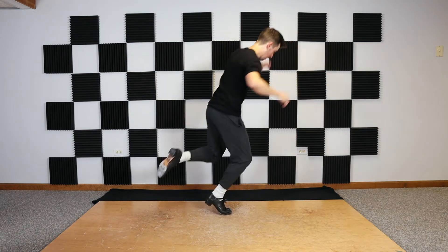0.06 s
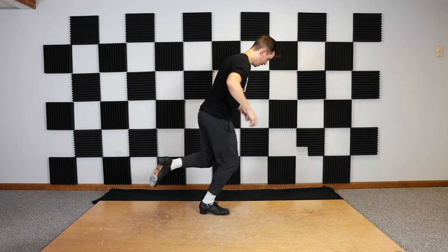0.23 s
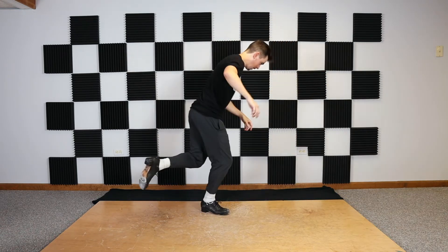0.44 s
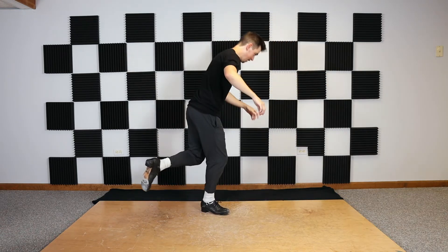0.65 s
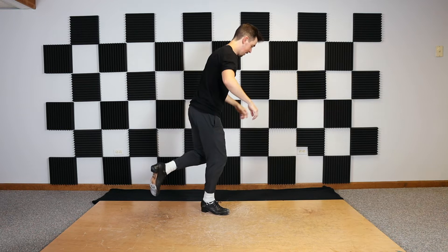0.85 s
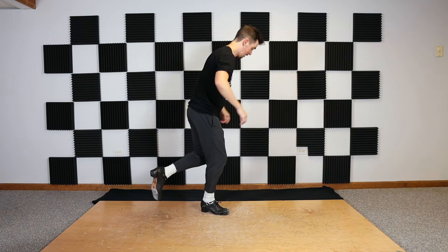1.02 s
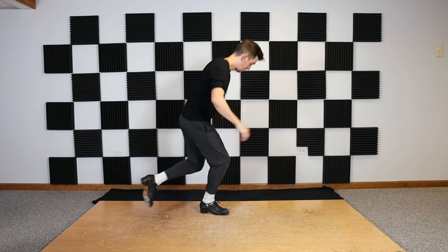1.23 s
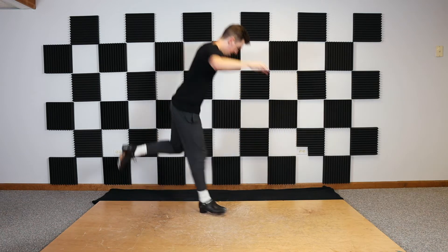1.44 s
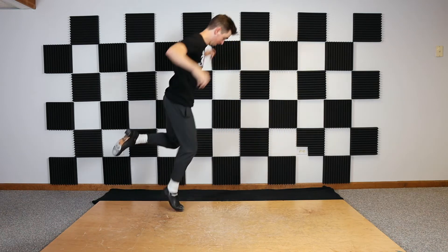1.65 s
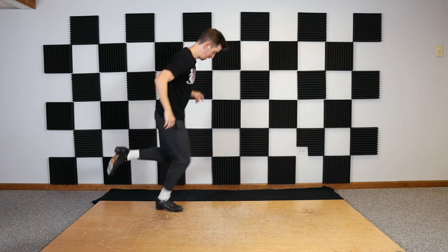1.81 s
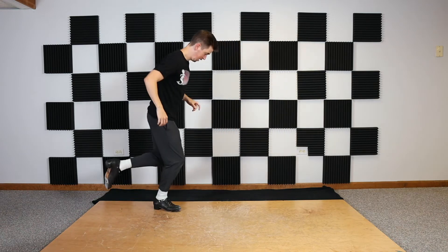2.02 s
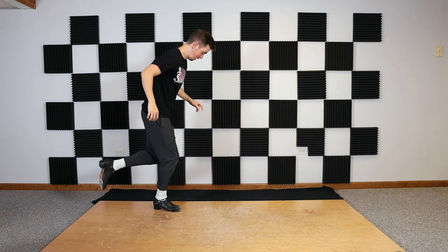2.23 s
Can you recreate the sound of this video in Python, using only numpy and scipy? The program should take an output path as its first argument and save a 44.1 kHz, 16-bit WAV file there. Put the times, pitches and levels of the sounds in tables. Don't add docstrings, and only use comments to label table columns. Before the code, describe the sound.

Tap shoes strike a wooden floor: two sharp taps, a pause, then three quick loud taps.

```python
import sys
import numpy as np
from scipy import signal
from scipy.fft import rfft, irfft
from scipy.io import wavfile

SR = 44100
rng = np.random.default_rng(int(sys.argv[2]) if len(sys.argv) > 2 else 0)


def how_loud(loudness_db):
    steps = np.asarray(loudness_db, float) / 20
    return 10 ** steps


def bounce(signal):
    frames = np.transpose(np.atleast_2d(signal))
    limited = np.clip(frames, -1, 1)
    pcm = np.round(limited * 32767).astype(np.int16)
    wavfile.write(sys.argv[1], SR, pcm)


N = 100503

# t/s, peak level/dB, plate ring f/Hz, board thump level/dB, room wash level/dB
TAPS = [
    (-.004, -6.5, 1617, -24, 0),
    (0.2226, -1, 1477, -14, 0),
    (1.51, -45.5, 1415, -6, -4),
    (1.5157, -34, 1440, -3, -2.5),
    (1.549, -2.5, 1753, -26, -1),
    (1.699, -1.5, 1808, -26.5, -5),
    (1.8749, -1, 1375, -20.5, -1),
]
# t/s, scuff level/dB, board thump level over scuff/dB, t60/s
SHIFTS = [
    (1.195, -76, 21, .1),
    (1.3195, -52, 10, .06),
    (1.3665, -42, 13, .05),
    (1.383, -47, 8, .1),
    (1.457, -52, 4, .08),
    (1.495, -70, 18, .05),
]
# f/Hz, width/Hz, level/dB
HEEL_MODES = [(1404, 87, 4.5), (1591.5, 92, 11.5), (2484, 180, -23), (2910, 780, -18), (3250, 50, -27.5),
              (4350, 260, -21.5), (5120, 320, -34), (6170, 190, -40)]
# f/Hz, width/Hz, level/dB
TOE_MODES = [(1059.5, 64, -5), (1368.5, 32, -9.5), (1553, 34, -3.5), (1878, 29, -6.5), (2017, 23, -14.5),
             (2556, 380, -15.5), (3405, 250, 1), (5120, 360, -17.5)]
# f/Hz, level under heel/dB, under toe/dB, under sole/dB, t60/s
BOARD_MODES = [(72, -18.5, -29.5, -42.5, 0.098), (95, -16, -19, -30, 0.34), (129, -12.5, -14.5, -9.5, .25),
               (140, 2, -8.5, -5.5, 0.2), (167.64, -15, -7.5, -4, 0.37), (202.9, -7, -3.5, 1.5, 0.32),
               (233.5, -12, -5.5, -9.5, 0.33), (256, -18.5, -6, -5, 0.31), (321.5, -18.5, -5.5, -3.5, .15),
               (368, -17.5, -15, -19.5, 0.05), (442, -16, -8.5, -14.5, 0.22), (640, -20, -22, -8, 0.044),
               (962, -1, -7.5, -7.5, .08)]
# f/Hz, level per Hz/dB
CRACK_SPECTRUM = [(1500, -18.5), (3000, 4), (4600, -2.5), (5600, -12), (7500, -22), (11000, -24),
                  (15500, -24.5)]
# delay t/s, level/dB
WALL_ECHOES = [(.0041, -7), (.0082, -11), (0.0123, -11.5), (0.0195, -18.5)]
# f/Hz, t60/s
ROOM_DECAY = [(100, 1), (500, 0.49), (1400, 0.45), (3000, 0.43), (5000, 0.44), (8000, 0.39), (14000, 0.033)]
# f/Hz, level per Hz/dB
HEEL_WASH = [(180, -45.5), (300, -20), (468, -22), (744, -20.5), (1330, -2), (2250, -16), (2880, -13.5),
             (4000, -32.5), (15500, -76)]
# f/Hz, level per Hz/dB
TOE_WASH = [(180, -41), (300, -11.5), (922, -9.5), (1030, -5.5), (1280, 0), (1810, 0.5), (3690, -16),
            (5760, -28), (15500, -62.5)]
# f/Hz, level per Hz/dB
AIR_SPECTRUM = [(260, -30), (450, 0), (1300, -3), (2800, -8), (5600, -13), (9500, -19), (12500, -30),
                (15700, -42)]
# f/Hz, level per Hz/dB
HUM_SPECTRUM = [(15, -59.5), (30, -33), (50, -25), (80, -10.5), (122, -1), (170, -12.5), (260, -18),
                (450, -24.5), (900, -120)]
# f/Hz, level per Hz/dB
RUSTLE_SPECTRUM = [(290, -21.5), (500, -1.5), (694, -14), (1200, -2.5), (4190, -12.5), (13000, -28)]
# t/s, rustle level/dB
MOTION = [(1.1, -100), (1.2, -77), (1.26, -69), (1.38, -68), (1.54, -68), (1.6, -90)]
# f/Hz, level per Hz/dB
SCUFF_SPECTRUM = [(240, -36), (400, -12.5), (638, -15.5), (1960, -12.5), (2300, -24), (4690, -28.5),
                  (12100, -46), (13000, -49)]

LEAD_S = 0.05
SOUND_SIZE = SR * 3 // 4
HEEL_BELOW_HZ = 1520
MODE_SCATTER_DB = 1.5
RING_RISE_S, RING_T60_S = 0.0004, 0.011
PANEL_T60_S, PANEL_DB = 0.045, -8.5
BOARD_RISE_S, SOLE_RISE_S, SCUFF_RISE_S = 0.0036, 0.0017, 0.001
CRACK_DB, CRACK_T60_S = -6, 0.013
CRACK_GROWS = 0.3
TOE_CRACK_DB, TOE_ECHO_DB = -5.5, -5.5
FOAM_DB_PER_S = 602.5
ROOM_DB, NEAR_DB, NEAR_SHARE, ROOM_RISE_S = -21, -10.5, 0.24, 0.0013
SCUFF_TAIL_DB = -13
AIR_DB, HUM_DB = -75, -61
TOP, KNEE = 0.9, 4.5


def along(points, hz):
    f, values = np.transpose(points)
    return np.interp(np.log(hz + 1), np.log(f + 1), values)


def noise(spectrum, size):
    gain = how_loud(along(spectrum, np.fft.rfftfreq(size, 1 / SR)))
    x = irfft(rfft(rng.standard_normal(size)) * gain, size)
    return x / x.std()


def rise(rise_s, t):
    return 1 - np.exp(-t / rise_s)


def ring(hz, db, t60, rise_s, t):
    envelope = how_loud(db - 60 * t / t60) * rise(rise_s, t) ** 2
    return envelope * np.sin(2 * np.pi * hz * t)


def room_tone():
    return how_loud(AIR_DB) * noise(AIR_SPECTRUM, N) + how_loud(HUM_DB) * noise(HUM_SPECTRUM, N)


def plate(ring_hz, modes, t):
    x = 1.8 * ring(ring_hz, 0, RING_T60_S, RING_RISE_S, t)
    for hz, width, db in modes:
        level = PANEL_DB + db + rng.normal(0, MODE_SCATTER_DB)
        x += ring(hz, level, PANEL_T60_S * 90 / width, RING_RISE_S, t)
    return x


def crack(force_db, heel, t):
    level = CRACK_DB + (0 if heel else TOE_CRACK_DB) + CRACK_GROWS * force_db
    return noise(CRACK_SPECTRUM, len(t)) * how_loud(level - 60 * t / CRACK_T60_S) * rise(RING_RISE_S, t)


def wall_echoes(ringing, burst):
    out = np.zeros(len(ringing))
    for delay_s, db in WALL_ECHOES:
        reflected = ringing + how_loud(-FOAM_DB_PER_S * delay_s) * burst
        out += how_loud(db) * np.pad(reflected, (round(delay_s * SR), 0))[:len(out)]
    return out


def thump(db, part, rise_s, t):
    out = np.zeros(len(t))
    for hz, *levels, t60 in BOARD_MODES:
        level = db + levels[part] + rng.normal(0, MODE_SCATTER_DB)
        out += ring(hz, level, t60, rise_s, t)
    return out


def wash(spectrum, near_db, far_db, near_share):
    hz, t, z = signal.stft(noise(spectrum, SOUND_SIZE), SR, nperseg=256)
    fall_db = -60 * t / along(ROOM_DECAY, hz)[:, None]
    near = how_loud(near_db + fall_db / near_share)
    far = how_loud(far_db + fall_db)
    return signal.istft(z * (far + near), SR, nperseg=256)[1][:SOUND_SIZE]


def tap(force_db, ring_hz, thump_db, wash_db):
    t = np.arange(SOUND_SIZE) / SR
    heel = ring_hz < HEEL_BELOW_HZ
    ringing = plate(ring_hz, HEEL_MODES if heel else TOE_MODES, t)
    burst = crack(force_db, heel, t)
    echoes = how_loud(0 if heel else TOE_ECHO_DB) * wall_echoes(ringing, burst)
    walls = wash(HEEL_WASH if heel else TOE_WASH, NEAR_DB, ROOM_DB, NEAR_SHARE) * rise(ROOM_RISE_S, t)
    board = thump(thump_db, 0 if heel else 1, BOARD_RISE_S, t)
    return ringing + burst + echoes + board + how_loud(wash_db) * walls


def rustle():
    s, db = np.transpose(MOTION)
    level = np.interp(np.arange(N) / SR, s, db, left=-np.inf, right=-np.inf)
    return how_loud(level) * noise(RUSTLE_SPECTRUM, N)


def shift(thump_db, t60):
    t = np.arange(SOUND_SIZE) / SR
    scuff = wash(SCUFF_SPECTRUM, 0, SCUFF_TAIL_DB, t60 / 0.24) * rise(SCUFF_RISE_S, t)
    return scuff + thump(thump_db, 2, SOLE_RISE_S, t)


def shoes():
    out = np.zeros(N + SR)
    for kind, events in ((tap, TAPS), (shift, SHIFTS)):
        for s, db, *settings in events:
            sound = kind(db, *settings) if kind is tap else kind(*settings)
            start = round((s + LEAD_S) * SR)
            out[start:][:len(sound)] += how_loud(db) * sound
    return out[round(LEAD_S * SR):][:N]


def scene():
    return (room_tone() + shoes() + rustle())[None]


def low_pass(x):
    return signal.sosfilt(signal.butter(12, 15830, fs=SR, output="sos"), x)


def record(dry):
    mix = dry / (1 + np.abs(dry / TOP) ** KNEE) ** (1 / KNEE)
    return low_pass(mix)


dry = scene()
out = record(dry)
bounce(out)
```